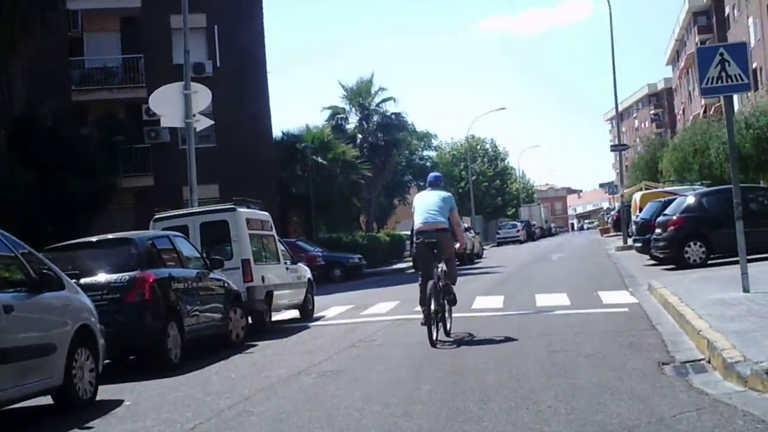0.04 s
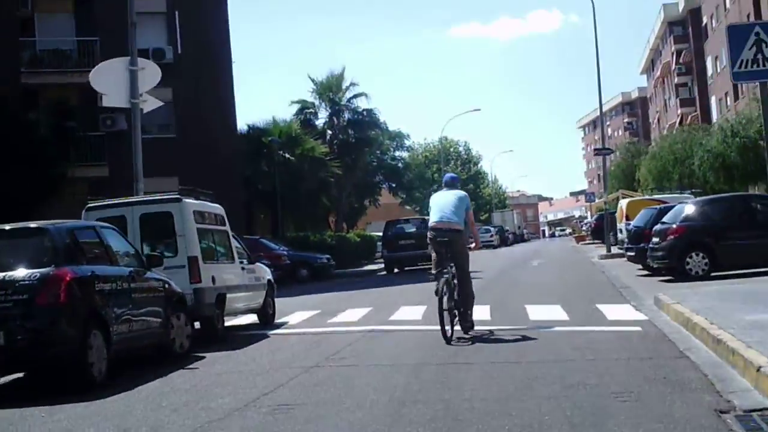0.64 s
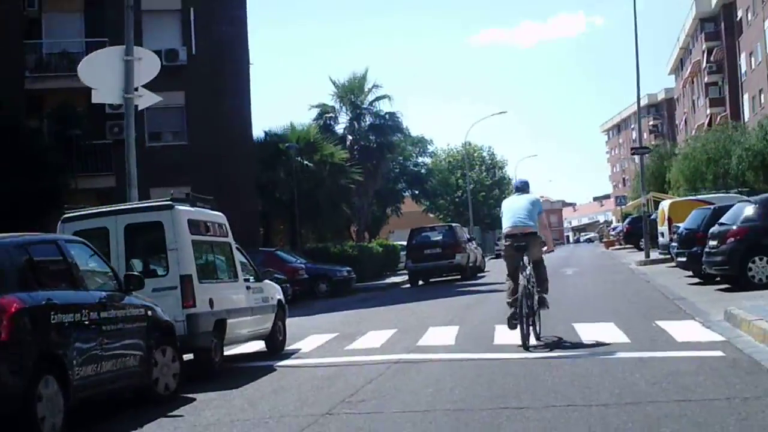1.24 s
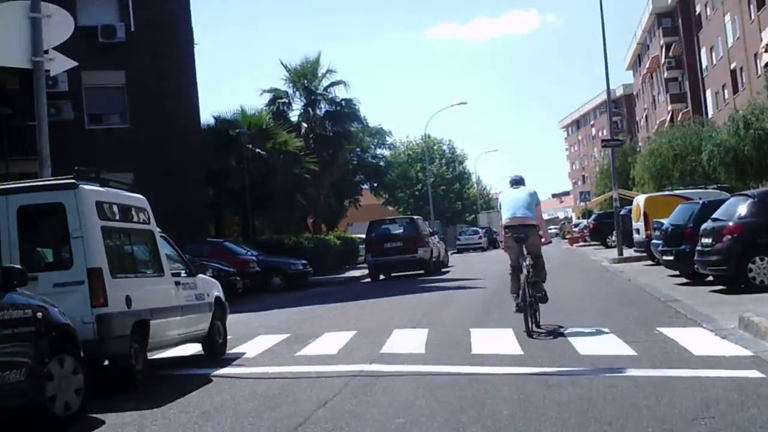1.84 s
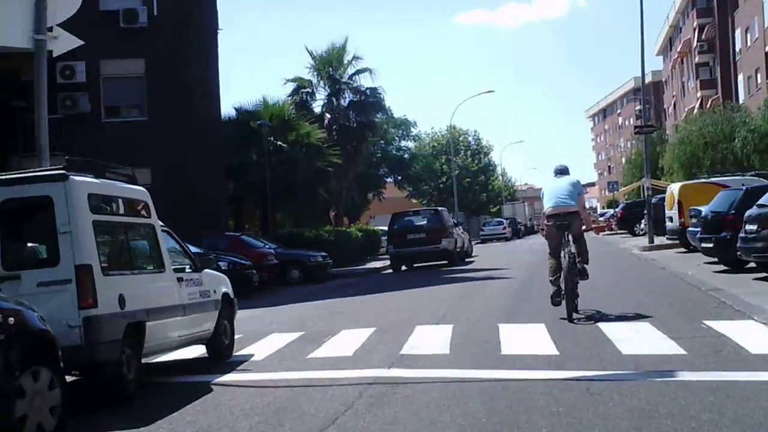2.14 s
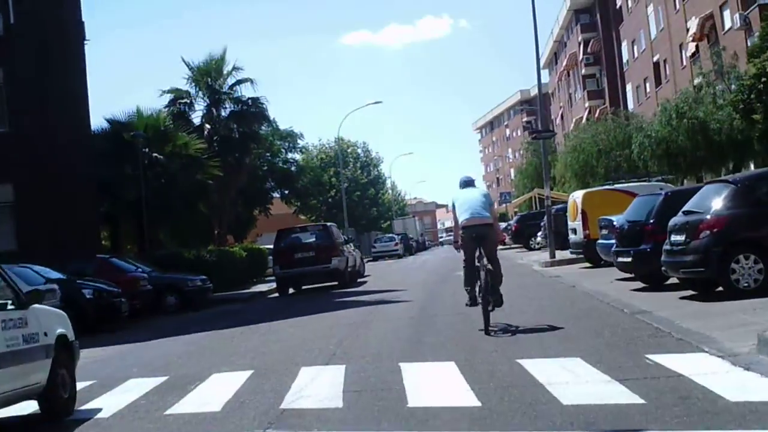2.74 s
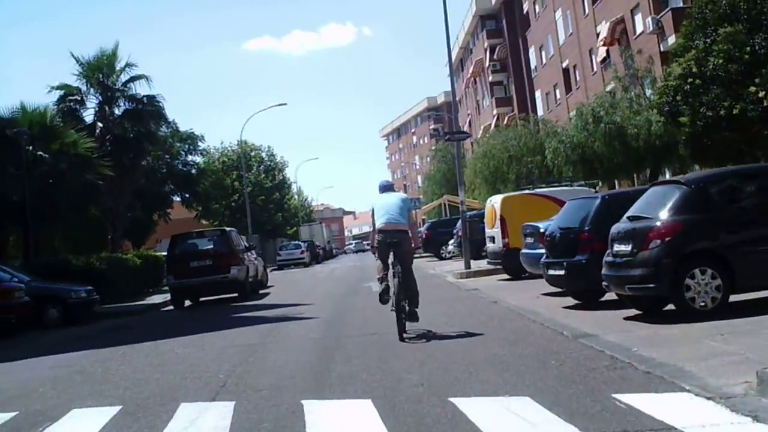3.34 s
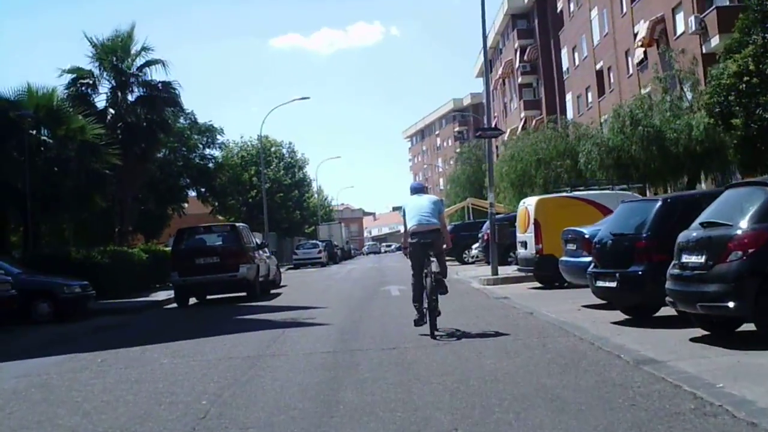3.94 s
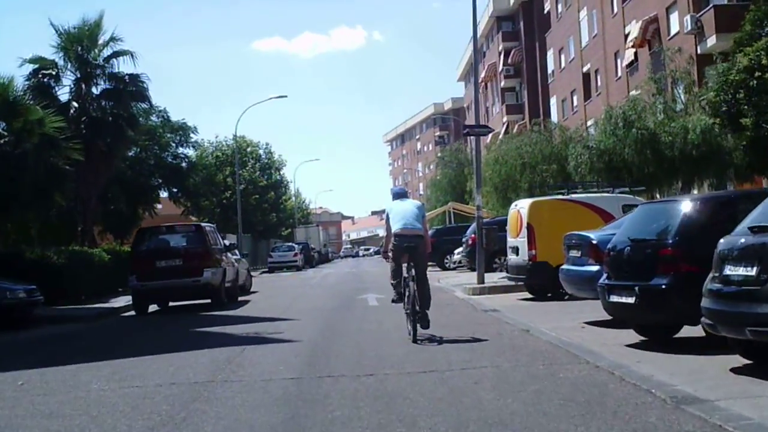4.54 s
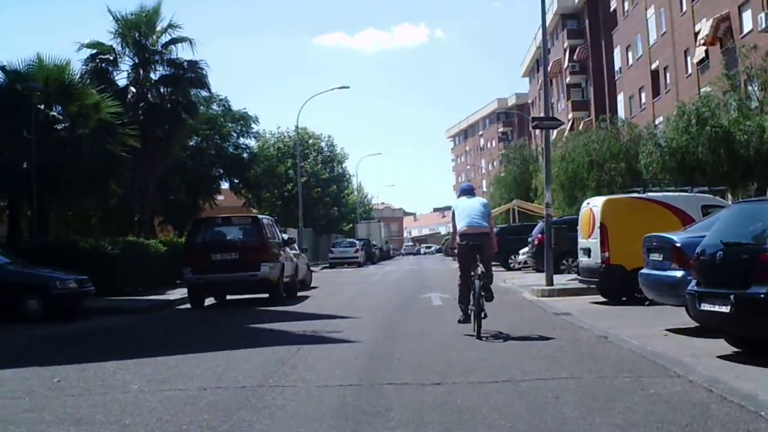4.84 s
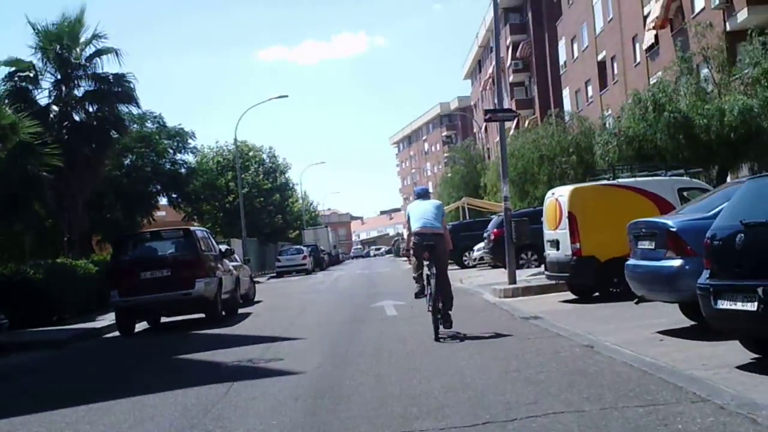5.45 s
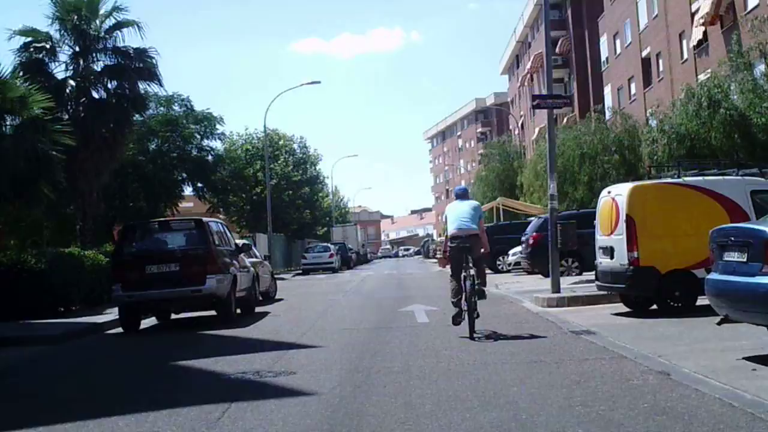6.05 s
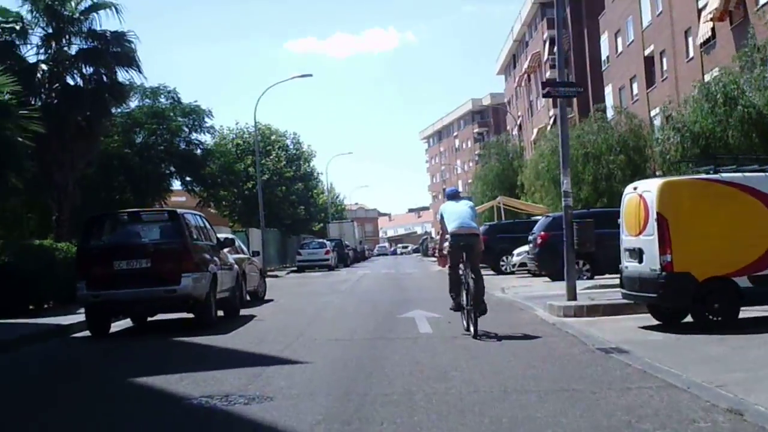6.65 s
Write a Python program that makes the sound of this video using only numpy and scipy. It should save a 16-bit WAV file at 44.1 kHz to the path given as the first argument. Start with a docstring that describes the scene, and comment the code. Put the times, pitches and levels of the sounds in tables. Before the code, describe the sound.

Bicycle tyres roar over rough asphalt while the camera housing knocks and rattles right at the microphone, with a little wind.

```python
"""On a bicycle over rough city asphalt, heard from the microphone of a camera in a loose plastic housing.
From the start the tyres roar and keep frame and mount humming, with a little wind on the microphone.
In the first two seconds hard jolts thump through the frame, and the housing, right at the microphone,
knocks hard enough to overload the recorder. Then the ride gets calmer: lighter knocks go on to the end,
and the housing chatters and buzzes on each rough patch."""
import sys
import numpy as np
from scipy import signal
from scipy.fft import rfft, irfft, next_fast_len
from scipy.io import wavfile
from scipy.ndimage import uniform_filter1d, map_coordinates

SR = 44100
rng = np.random.default_rng(int(sys.argv[2]) if len(sys.argv) > 2 else 0)


def persist_wave(psi):
    """Save psi, clipped to +-1, as 16-bit WAV."""
    counts = np.round(np.clip(psi, -1, 1) * 32767).astype(np.int16)
    wavfile.write(sys.argv[1], SR, np.atleast_2d(counts).T)


N = 295029

# the housing knocks in its mount: (time [s], relative strength [dB], contact pitch [Hz], relative tick [dB])
HOUSING_KNOCKS = [(0.0608, -29, 1190, -33), (0.0937, -17, 1310, -27), (0.1171, -11, 1300, -27),
                  (0.1284, -16, 1390, -21.5), (0.1715, -15.5, 1160, -31), (0.195, -23, 1205, -31),
                  (0.2344, -12.5, 1700, -41), (0.2783, -23.5, 1640, -31), (0.3331, -16, 1580, -31),
                  (0.3521, -12, 1100, -29), (0.388, -4.5, 1340, -18), (0.405, -5.5, 1260, -19),
                  (0.4174, -5.5, 1350, -26), (0.4244, -10, 1070, -27.5), (0.4783, -14.5, 1530, -29),
                  (0.5217, -16.5, 1540, -30), (0.5621, -19.5, 1290, -34), (0.6574, -12.5, 1480, -39),
                  (0.6818, -12.5, 1500, -34), (0.6883, -10.5, 1640, -26.5), (0.7143, 0, 1120, -23.5),
                  (0.9702, -20, 1520, -60), (1.1498, -10.5, 1610, -23), (1.1644, -15, 1030, -44),
                  (1.257, -18, 1560, -34.5), (1.3144, -16.5, 1320, -39), (1.3344, -13.5, 1540, -29),
                  (1.3508, -7, 1120, -19.5), (1.3723, -14, 1600, -22.5), (1.3912, -12, 1550, -41),
                  (1.4765, -11, 1330, -25), (1.4945, -14.5, 1510, -30), (1.5444, -17, 1610, -27),
                  (1.5674, -12.5, 1510, -19.5), (1.5728, -6.5, 1310, -32), (1.5968, -6, 1470, -17),
                  (1.6044, -8.5, 1310, -33), (1.6152, -6.5, 1350, -27), (1.721, -22, 1620, -35),
                  (1.7828, -18, 1500, -57.5), (1.944, -8.5, 1090, -24), (1.9484, -8.5, 1620, -23),
                  (2.0248, -5.5, 1090, -33), (2.0374, -13.5, 1550, -40.5), (2.1236, -17, 1320, -42),
                  (2.157, -19, 1210, -39), (2.1809, -15, 1570, -25.5), (2.2608, -20.5, 1550, -33),
                  (2.2877, -20, 1500, -35), (2.3694, -22.5, 1540, -57), (2.5107, -17, 1600, -35),
                  (2.584, -20, 1280, -45), (2.6429, -11.5, 1580, -28), (2.7576, -21, 1650, -42),
                  (2.9527, -16.5, 1530, -26.5), (2.9741, -14.5, 1460, -30), (3.0365, -19, 1520, -32.5),
                  (3.1782, -19.5, 1500, -32), (3.2555, -20, 1520, -51), (3.3323, -17.5, 1530, -53),
                  (3.4166, -14, 1590, -31), (3.484, -16, 1520, -43), (3.5184, -18.5, 1510, -29),
                  (3.5603, -10.5, 1400, -22), (3.699, -13.5, 1680, -35), (3.7134, -16, 1450, -29),
                  (3.7274, -17.5, 1650, -30), (3.8132, -17.5, 1550, -45), (3.8841, -16, 1500, -35),
                  (4.0138, -21, 1530, -34.5), (4.0921, -16, 1640, -36), (4.1131, -18, 1560, -34),
                  (4.176, -20, 1570, -51), (4.2098, -14.5, 1570, -48), (4.3824, -24, 1440, -49),
                  (4.556, -22, 1560, -44), (4.8908, -15, 1490, -37.5), (5.02, -16.5, 1530, -31.5),
                  (5.218, -11.5, 1530, -24), (5.2819, -20, 1060, -32), (5.3228, -19, 1650, -35),
                  (5.4435, -14, 1490, -28.5), (5.4605, -20, 1640, -25.5), (5.5194, -20.5, 1040, -40),
                  (5.5732, -13.5, 1580, -27), (5.6526, -20, 1520, -34), (5.672, -13.5, 1540, -31.5),
                  (5.7054, -16, 1340, -33.5), (5.759, -24, 1550, -37), (5.7967, -17.5, 1550, -38),
                  (5.8177, -16.5, 1510, -30), (5.876, -14, 1570, -27.5), (5.8987, -21, 1490, -33),
                  (6.0162, -21, 1530, -57), (6.2592, -23, 1280, -29), (6.3584, -17.5, 1720, -46),
                  (6.3979, -14.5, 1570, -40), (6.4346, -19, 1260, -43)]
# the wheel drops onto a hard edge: (time [s], relative level [dB])
WHEEL_JOLTS = [(0.4, -9), (0.419, -31), (0.713, -32), (1.352, -36), (1.572, -18.5), (1.596, -7.5),
               (1.617, -19), (1.944, -22.5), (2.025, -38)]
# the tyres cross rough asphalt: (start [s], length [s], relative buzz [dB], relative shake [dB])
ROUGH_PATCHES = [(0.063, 0.09, -34, -23.5), (0.173, 0.026, -41, -23.5), (0.25, 0.038, -42, -31),
                 (0.353, 0.022, -36, -25), (0.384, 0.049, -26, -19.5), (0.456, 0.032, -42, -26.5),
                 (0.52, 0.061, -38, -32), (0.67, 0.077, -37, -23), (1.156, 0.011, -41, -22.5),
                 (1.196, 0.043, -31, -29), (1.304, 0.036, -33, -29), (1.35, 0.04, -34, -23.5),
                 (1.457, 0.065, -31.5, -29.5), (1.537, 0.088, -28, -19.5), (1.64, 0.041, -41, -32),
                 (1.941, 0.036, -34, -23), (2.022, 0.042, -34.5, -24.5), (2.124, 0.073, -33, -22.5),
                 (2.252, 0.058, -35, -23.5), (2.482, 0.057, -44, -31), (2.625, 0.046, -31.5, -31),
                 (2.869, 0.029, -33, -38), (2.949, 0.059, -35.5, -28.5), (3.395, 0.018, -39.5, -33.5),
                 (3.514, 0.087, -32.5, -31), (3.633, 0.036, -32.5, -31), (3.692, 0.047, -31.5, -26),
                 (4.021, 0.11, -44, -33.5), (4.38, 0.0205, -37.5, -27.5), (4.444, 0.011, -42, -36),
                 (4.72, 0.077, -35, -31), (4.88, 0.02, -42, -32.5), (5.024, 0.018, -41, -25.5),
                 (5.095, 0.048, -40, -31.5), (5.187, 0.055, -32, -28.5), (5.281, 0.027, -35.5, -27.5),
                 (5.431, 0.06, -43, -29), (5.581, 0.026, -33, -25.5), (5.654, 0.034, -36.5, -24),
                 (5.778, 0.043, -36, -29), (5.872, 0.033, -41, -34), (6.238, 0.05, -39, -30),
                 (6.298, 0.092, -35, -32), (6.647, 0.064, -44, -34)]
# air on the microphone: (time [s], relative level [dB])
WIND_LEVELS = [(0.0, -42), (1.5, -43), (1.8, -45.5), (3.2, -46.5), (3.65, -40.5), (4.9, -47.5),
               (5.55, -43.5), (6.69, -46)]
# resonances of bicycle frame, camera mount, housing, its catch and seam:
# (frequency [Hz], width [Hz], gain [dB])
FRAME_MODES = [(137.7, 9.9, 4), (167, 53, -8), (203, 82, -11.5), (246, 32, -16), (347.3, 17.5, 1)]
MOUNT_MODES = [(499.5, 61, -1.5), (532.3, 34.7, 5.5), (570, 69, -16.5), (689, 29, -14.5)]
HOUSING_MODES = [(1073, 50, -3), (1200, 230, -8.5), (1259, 170, 1), (1526, 180, 2.5), (1685, 210, -11),
                 (2010, 280, -8.5), (2150, 320, -19.5), (2756, 89, -9)]
CATCH_MODES = [(2840, 260, 2.5), (3200, 870, -1.5), (3974, 150, 3.5), (4200, 250, -16), (5400, 1300, -9)]
SEAM_MODES = [(4170, 150, -3.5), (4800, 720, -8.5), (4620, 950, 6.5), (5800, 920, 8)]
# spectra of tyre roar, thump and wind at the microphone: (frequency [Hz], relative density [dB])
TYRE_SPECTRUM = [(40, -19), (110, -7), (300, 0), (450, -2), (700, 0), (850, -20.5), (1080, -5.5),
                 (1400, -5), (2000, -17.5), (3400, -29.5), (4300, -26), (5500, -34)]
THUMP_SPECTRUM = [(30, -33), (90, -6), (200, -7.5), (380, -0.5), (600, -4.5), (900, -8), (2000, -49.5)]
WIND_SPECTRUM = [(10, -3.5), (25, 0.5), (42, -0.5), (70, -3.5), (100, -8), (200, -33.5), (1000, -61.5)]

USUAL_SHAKE_DB, USUAL_KNOCK_DB, USUAL_BUZZ_DB = -30, -15, -40  # reference levels of the ride
LEAD_S = .003  # a scrape leads each blow by this much


def knocks(shake_db):
    """Right at the microphone, each knock clacks the housing, rings the mount and ticks the hard catch."""
    s, strength_db, pitch_hz, tick_db = np.vstack([HOUSING_KNOCKS, light_knocks(shake_db)]).T
    start = s - LEAD_S
    force = bounces(len(s), gap_s=.0018, rebound=0.51, scrape=.1, scrape_t60=0.029)
    spread = shell_echoes(force, share=0.71, t60=0.0083)
    # the stiffness of the contact favours the band around its own pitch
    stiff = filtered(spread, lambda hz: 0.23 + resonance(hz, pitch_hz[:, None], width=380))
    clack = rung(softened(stiff, high_hz=3700), HOUSING_MODES, low_hz=900)
    mount = rung(softened(force, high_hz=860), MOUNT_MODES, low_hz=296)
    mount_db = -25.5 + 0.96 * (strength_db - USUAL_KNOCK_DB)
    skitter = bounces(len(s), gap_s=0.00099, rebound=1.0, scrape=0.12, scrape_t60=0.019)
    tick = rung(skitter, CATCH_MODES, low_hz=2200)
    return (placed(start, clack, strength_db - 7.5) + placed(start, mount, mount_db)
            + placed(start, tick, tick_db - 4.5))


def light_knocks(shake_db, count=70):
    """Rows like those of HOUSING_KNOCKS at random moments, stronger where the bicycle shakes more."""
    s = rng.uniform(0, N / SR, count)
    db = -21 + 0.13 * (at_times(shake_db, s) - USUAL_SHAKE_DB) + rng.standard_normal(count)
    pitch_hz = 1500 * np.exp(0.11 * rng.standard_normal(count))
    return np.column_stack([s, db, pitch_hz, db - 22.5])


def bounces(events, gap_s, rebound, scrape, scrape_t60, count=4, size=3072):
    """Force of each knock: a scrape leads in to the blow, then rebounds follow at uneven gaps."""
    t = np.arange(size) / SR
    force = scrape * rng.standard_normal((events, size))
    force *= np.minimum(t / LEAD_S, 1) * amp(-60 * t / scrape_t60)
    force[:, round(LEAD_S * SR)] += 1  # the blow
    rebound_s = LEAD_S + np.cumsum(gap_s * rng.uniform(.3, 1.7, (events, count)), axis=1)
    sizes = rng.standard_normal((events, count)) * rebound ** np.arange(1, count + 1)
    force[np.arange(events)[:, None], np.minimum(rebound_s * SR, size - 1).astype(int)] += sizes
    return force


def shell_echoes(force, share, t60, size=900):
    """A blow runs to and fro in the thin shell, which spreads it over a few milliseconds."""
    t = np.arange(size) / SR
    tail = rng.standard_normal((len(force), size)) * amp(-60 * t / t60)
    tail *= share / np.linalg.norm(tail, axis=1, keepdims=True)
    return force + signal.fftconvolve(force, tail, axes=1)[:, :force.shape[1]]


def jolts():
    """A hard edge under the wheel sends a dull, short thump up the fork to the microphone."""
    s, db = np.transpose(WHEEL_JOLTS)
    t = np.arange(SR // 8) / SR
    thump = coloured(rng.standard_normal((len(s), len(t))), THUMP_SPECTRUM)
    envelope = (1 - np.exp(-t / 0.00053)) * amp(-60 * t / 0.05)
    return placed(s, thump * envelope, db - 2.5)


def rattle(shake_db, buzz_db):
    """Shaken harder, the housing chatters louder and faster; catch and seam buzz on rough patches."""
    bump_db = shake_db - USUAL_SHAKE_DB
    hop = wobble(75)  # the camera hops in its mount, so the contacts come in clumps
    taps = contacts(rate=450 * amp(1.1 * bump_db), scatter_db=17.5) * amp(6.8 * hop)
    chatter = steady(rung(softened(taps, high_hz=2900), HOUSING_MODES, low_hz=854))
    catch_bursts = amp(1.1 * hop + 8.9 * wobble(220)) * rng.standard_normal(N)
    catch = steady(rung(catch_bursts, CATCH_MODES, low_hz=2400), size=1800)
    seam_bursts = amp(11 * hop + 10 * wobble(170)) * rng.standard_normal(N)
    seam = steady(rung(seam_bursts, SEAM_MODES, low_hz=3600), size=1800)
    return amp(-40.5 + 1.02 * bump_db) * chatter + amp(buzz_db - 5) * catch + amp(buzz_db - 4) * seam


def creaks(buzz_db, strays=60, lag_s=.003, rub_s=.0015):
    """Plastic slips along the seam with a tiny rub, after each listed knock and at random between."""
    knock_s, _, _, tick_db = np.transpose(HOUSING_KNOCKS)
    stray_s = rng.uniform(0, N / SR, strays)
    stray_db = -29.5 + 0.53 * (at_times(buzz_db, stray_s) - USUAL_BUZZ_DB)
    s = np.concatenate([knock_s + lag_s, stray_s])
    db = np.concatenate([tick_db - 1, stray_db]) + 2 * rng.standard_normal(len(s))
    age = np.arange(SR // 40) / SR / rub_s
    rub = rng.standard_normal((len(s), len(age))) * age * np.exp(-age ** 2)
    return placed(s, rung(rub, SEAM_MODES, low_hz=3660), db)


def road(shake_db):
    """Below the camera, the grain of the asphalt roars under the tyres and keeps frame and mount humming."""
    bump_db = shake_db - USUAL_SHAKE_DB
    roar = unit(coloured(rng.standard_normal(N), TYRE_SPECTRUM))
    roar *= amp(-34.5 + 0.66 * bump_db + 1.5 * wobble(12))
    tremor = softened(rng.standard_normal(N), high_hz=513)
    frame = steady(rung(tremor, FRAME_MODES, low_hz=95), size=7000)
    taps = softened(contacts(rate=500, scatter_db=10), high_hz=920)
    mount = steady(rung(taps, MOUNT_MODES, low_hz=365))
    return roar + amp(-34.5 + 0.2 * bump_db) * frame + amp(-35 + 0.85 * bump_db) * mount


def roughness(levels_db, smooth_db, rise_s, fall_s, ease_db_per_s=0.6):
    """Level in dB: each rough patch rises, holds and falls above the slowly easing smooth asphalt."""
    t = np.arange(N) / SR
    level = amp(smooth_db - ease_db_per_s * (t - t.mean()))
    for (start, length, *_), db in zip(ROUGH_PATCHES, levels_db):
        near = slice(max(int(start * SR) - SR // 8, 0), int((start + length) * SR) + SR // 4)
        away = np.maximum((start - t[near]) / rise_s, (t[near] - start - length) / fall_s)
        level[near] = np.maximum(level[near], amp(db) * np.exp(-np.maximum(away, 0)))
    return 20 * np.log10(level)


def wind():
    """The air stream buffets the microphone in soft lumps."""
    wind_db = np.interp(np.arange(N) / SR, *np.transpose(WIND_LEVELS))
    gusts = amp(wind_db + 1.7 + 0.7 * wobble(4.2))
    return gusts * unit(coloured(rng.standard_normal(N), WIND_SPECTRUM))


def contacts(rate, scatter_db):
    """Small impacts of random size at random moments, about rate a second."""
    hit = rng.random(N) < rate / SR
    return hit * rng.choice([-1, 1], N) * amp(scatter_db * rng.uniform(-1, 1, N))


def softened(force, high_hz):
    """A soft contact passes little above high_hz."""
    return signal.sosfilt(signal.butter(3, high_hz, fs=SR, output='sos'), force)


def rung(force, modes, low_hz):
    """A part answers a force with its modes and radiates little below low_hz."""
    ring = filtered(force, lambda hz: sum(amp(db) * resonance(hz, c, w) for c, w, db in modes))
    return signal.sosfilt(signal.butter(2, low_hz, 'high', fs=SR, output='sos'), ring)


def resonance(hz, centre, width):
    """Causal response of one damped mode."""
    return 1j * hz * width / (centre ** 2 - hz ** 2 + 1j * hz * width)


def filtered(x, response):
    """x times a complex response of frequency."""
    n = x.shape[-1]
    padded = next_fast_len(n + min(n, SR // 2))
    return irfft(rfft(x, padded) * response(np.fft.rfftfreq(padded, 1 / SR)), padded)[..., :n]


def coloured(x, points):
    """x shaped by (frequency [Hz], gain [dB]) points on a log axis."""
    f, db = np.transpose(points)
    return filtered(x, lambda hz: amp(np.interp(np.log(hz + 1), np.log(f), db)))


def placed(times, sounds, db, size=130):
    """Each row of sounds at its time, with its loudest moment at its level."""
    loudest = np.sqrt(uniform_filter1d(sounds ** 2, size, axis=1, mode='constant').max(axis=1))
    scaled = sounds * (amp(db) / loudest)[:, None]
    at = np.round(np.asarray(times) * SR).astype(int)[:, None] + np.arange(sounds.shape[1])
    return np.bincount(np.maximum(at, 0).ravel(), scaled.ravel(), N)[:N]


def steady(x, size=3500):
    """Keep the fine grain of x but hold its slow level near rms 1."""
    power = np.abs(uniform_filter1d(uniform_filter1d(x ** 2, size), size // 2))
    return x / np.sqrt(power + np.mean(x ** 2) / 20)


def wobble(rate):
    """A smooth random curve, rate knots a second."""
    return map_coordinates(rng.standard_normal(int(N * rate / SR) + 4), [np.arange(N) * rate / SR])


def at_times(curve, s):
    """The value of a curve at the given moments."""
    return np.interp(s, np.arange(N) / SR, curve)


def amp(db):
    """Decibels to gain."""
    return 10 ** (np.asarray(db) / 20)


def unit(x):
    """Scale to rms 1."""
    return x / np.sqrt(np.mean(x ** 2) + 1e-20)


def scene():
    """All reaches the one microphone through the bicycle or from right beside it."""
    _, _, buzzes_db, shakes_db = np.transpose(ROUGH_PATCHES)
    shake_db = roughness(shakes_db + 2.5, smooth_db=-34, rise_s=0.0082, fall_s=0.014)
    buzz_db = roughness(buzzes_db, smooth_db=-61, rise_s=.005, fall_s=.01)
    mix = knocks(shake_db) + creaks(buzz_db) + jolts() + rattle(shake_db, buzz_db) + road(shake_db) + wind()
    return mix[None]


def record(dry, band_hz=5000, steeper_hz=5927, ceiling=.72, top_hz=16000):
    """The camera has a narrow band; the hardest knocks clip and splash a little above it."""
    narrow = filtered(dry, lambda hz: 1 / np.sqrt(1 + (hz / band_hz) ** 30) / (1 + (hz / steeper_hz) ** 36))
    clipped = narrow / (1 + np.abs(narrow / ceiling) ** 16) ** (1 / 16)
    return filtered(clipped, lambda hz: hz < top_hz)


dry = scene()
out = record(dry)
persist_wave(out)
```